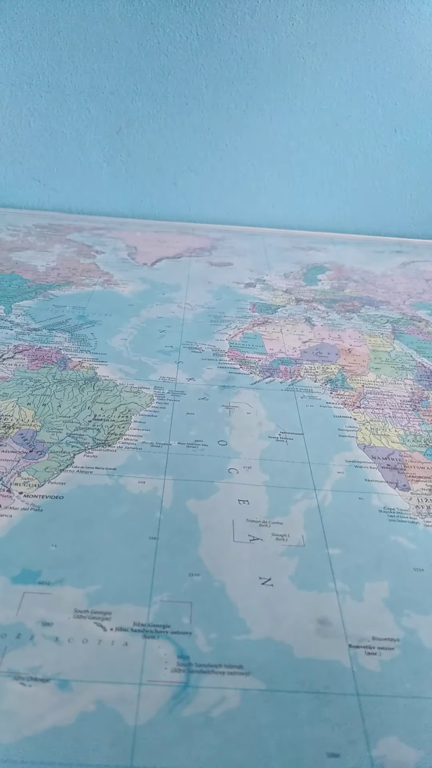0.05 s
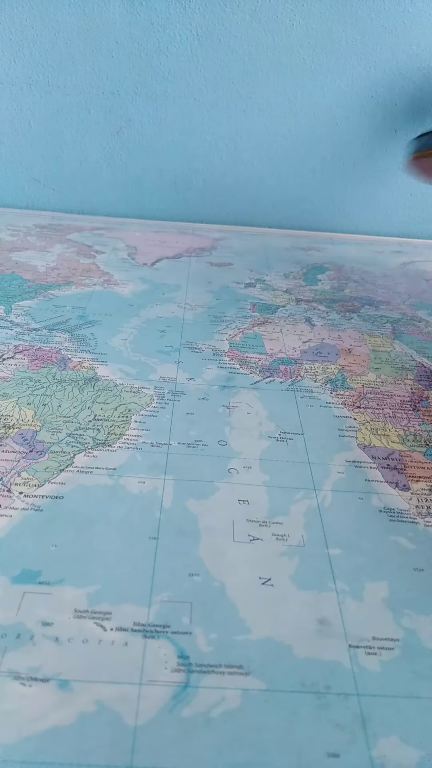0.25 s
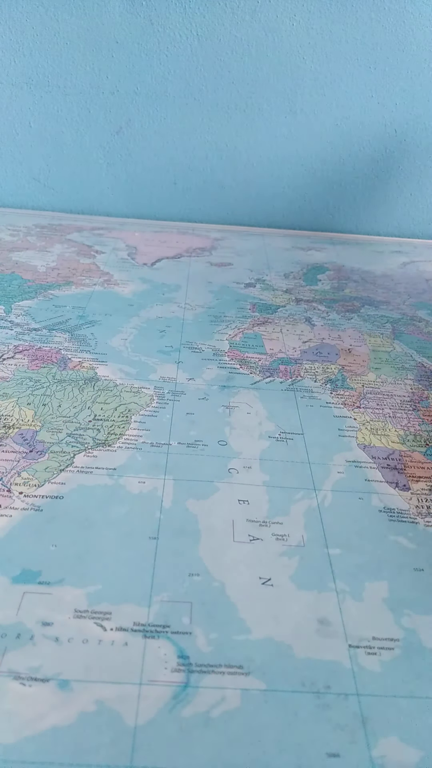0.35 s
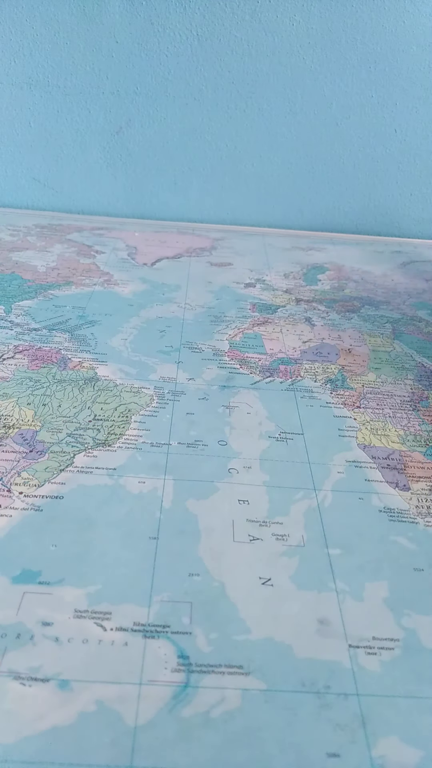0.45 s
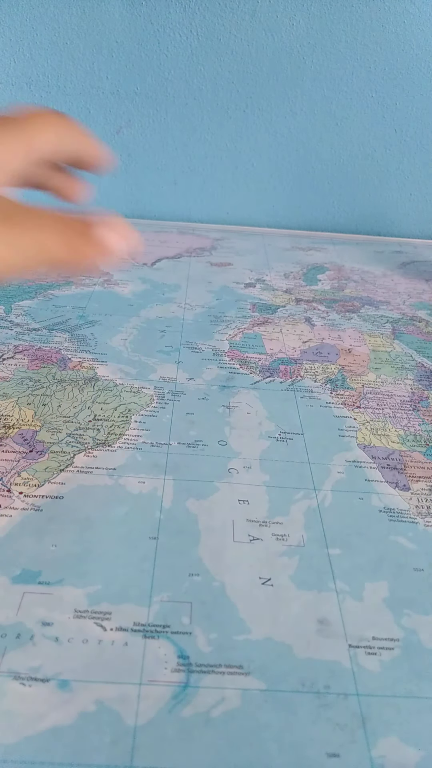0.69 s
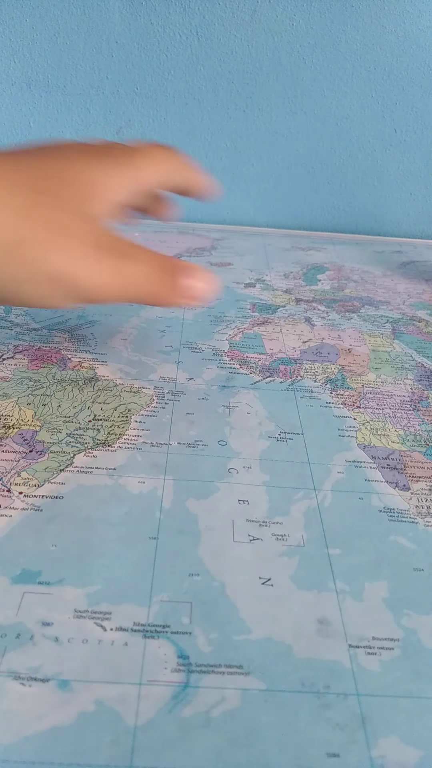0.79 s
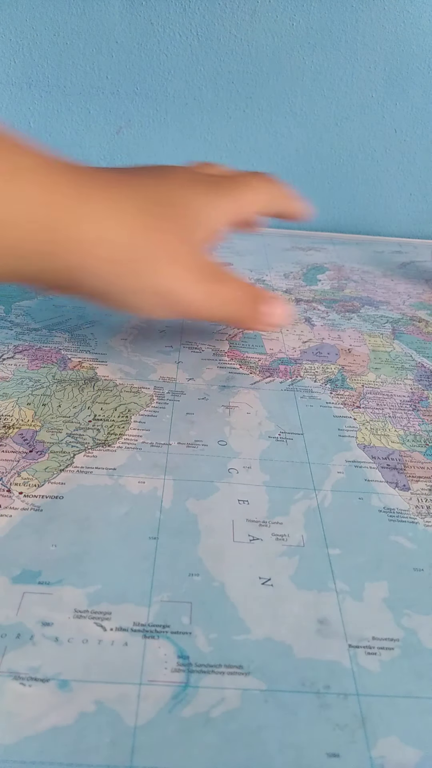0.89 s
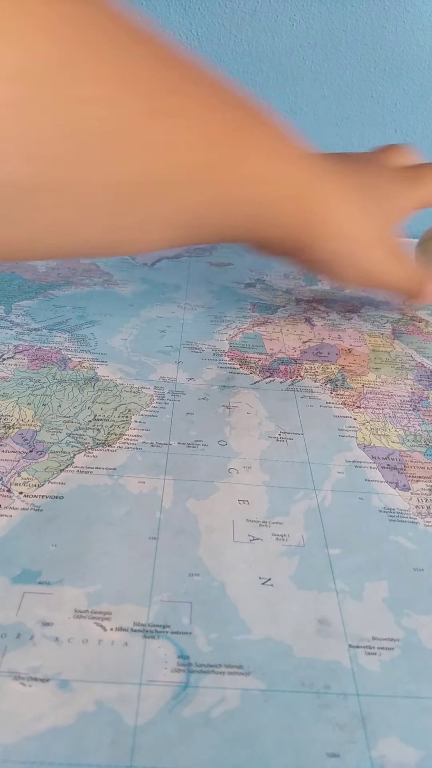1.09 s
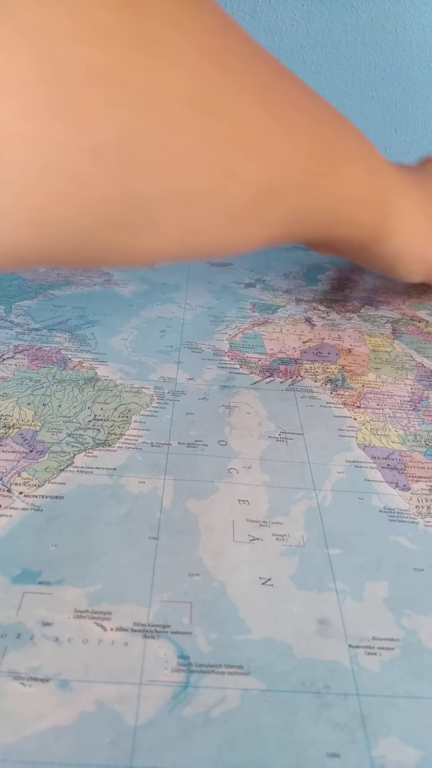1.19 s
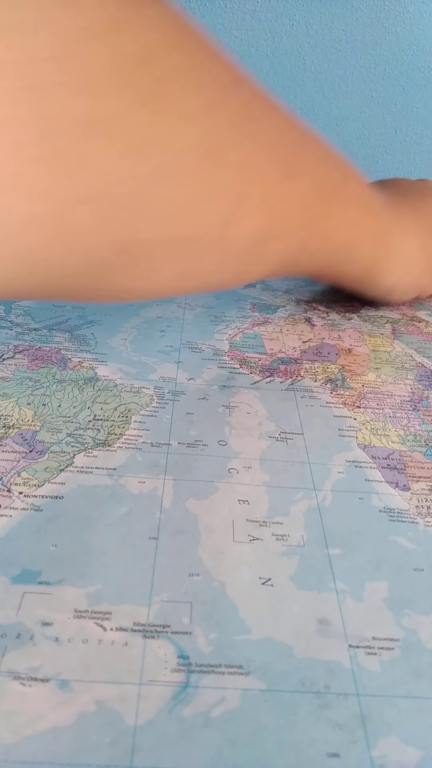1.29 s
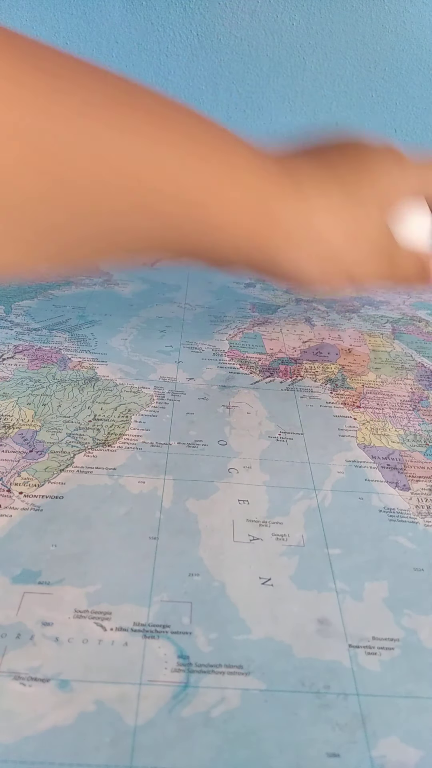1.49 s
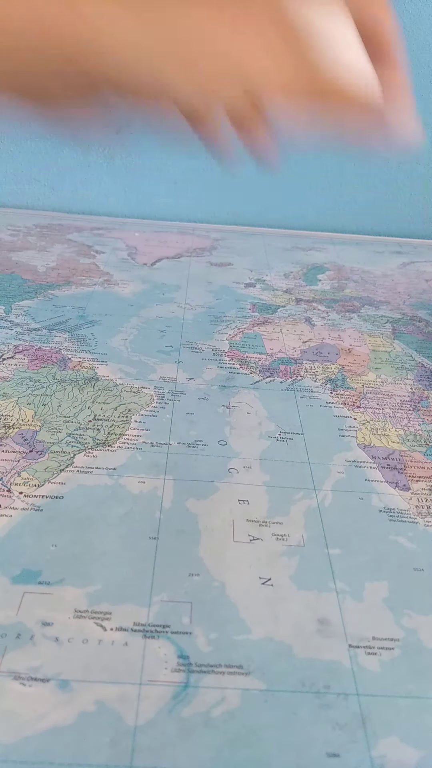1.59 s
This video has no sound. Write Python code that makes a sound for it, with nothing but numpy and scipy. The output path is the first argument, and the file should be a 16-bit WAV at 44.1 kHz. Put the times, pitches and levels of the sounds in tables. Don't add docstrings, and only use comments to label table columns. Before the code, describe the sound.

Two crisp hollow ball bounces ring a desk panel and small room, followed by a tiny double tick, then quiet dull arm bumps, skin hissing over paper and a nail tap, heard close in stereo by a phone.

```python
import sys
import numpy as np
from scipy import signal
from scipy.io import wavfile

SR = 44100
rng = np.random.default_rng(int(sys.argv[2]) if len(sys.argv) > 2 else 0)


def materialize(psi):
    bounded = np.clip(np.atleast_2d(psi).T, -1, 1)
    quanta = np.round(bounded * 32767).astype(np.int16)
    wavfile.write(sys.argv[1], SR, quanta)


def volts_from_db(level):
    exponent = np.asarray(level, float) / 20
    return 10 ** exponent


N = 72765

FADE_DB_PER_S2 = 174
PAPER_ALIKE = [(100, 0.7), (1400, -0.52), (4000, 0.03)]    # (pitch [Hz], likeness of left and right [-1..1])


def rms_one(x):
    return x / np.sqrt(np.mean(x ** 2) + 1e-20)


def in_time(rows):
    s, *columns = np.transpose(rows)
    return [np.interp(np.arange(N) / SR, s, column) for column in columns]


def at_hz(points, hz):
    table_hz, values = np.transpose(points)
    return np.interp(np.log(hz), np.log(table_hz), values)


def sides(pan_db):
    return volts_from_db(np.array([pan_db, -pan_db]) / 2)


def band(x, edges_hz):
    return signal.sosfilt(signal.butter(3, edges_hz, "band", fs=SR, output="sos"), x)


def steep(x, cut_hz):
    return signal.sosfilt(signal.cheby2(10, 40, cut_hz, fs=SR, output="sos"), x)


def drift(rate):
    r = np.exp(-80 * np.pi * rate / SR)
    slow = signal.lfilter([1], [1, -2 * r, r * r], rng.standard_normal(N // 40 + 502))[500:]
    return np.interp(np.arange(N) / 40, np.arange(len(slow)), rms_one(slow))


def flicker(patchy_db):
    together = 0.6 * drift(14)
    return lambda hz: volts_from_db(patchy_db * (together + drift(36.0)))


def banded(spectrum, alike, gain_at, size=N):
    out = 0
    edges_hz = 30 * 2 ** (np.arange(28) / 3)
    white = rng.standard_normal((2, 2, size))
    for k, (low, high) in enumerate(zip(edges_hz, edges_hz[1:])):
        third = signal.butter(2, [low, high], "band", fs=SR, output="sos")
        mid, side = signal.sosfilt(third, white[k % 2])
        hz = np.sqrt(low * high)
        likeness = np.clip(at_hz(alike, hz), -1, 1)
        stereo = np.sqrt(1 + likeness) * mid + np.sqrt(1 - likeness) * side * [[1], [-1]]
        out = out + volts_from_db(at_hz(spectrum, hz)) * gain_at(hz) * stereo
    return out


def ring(clicks, hz, t60):
    r, w = volts_from_db(-60 / (t60 * SR)), 2 * np.pi * hz / SR
    return signal.lfilter([0, np.sin(w)], [1, -2 * r * np.cos(w), r * r], clicks + 1e-18)


def bounce(contacts, modes):
    left_lag_s = 0.0002
    out = np.zeros((2, N))
    for hz, level_db, t60, pan_db in modes:
        clicks = np.zeros((2, N))
        for s, db, side_db, bright_db in contacts:
            at = [int((s + left_lag_s) * SR), int(s * SR)]
            chance_db = rng.normal(0, 1.5, 2)
            strike_db = db + level_db + bright_db * np.log2(hz / 3000) + chance_db
            clicks[[0, 1], at] = volts_from_db(strike_db) * sides(side_db + pan_db) * rng.choice([-1, 1])
        out += ring(clicks, hz, t60)
    return out


def ball_bounces():
    # (time [s], level [dB], left-right [dB], brightness [dB per octave])
    first_contacts = [
        (.2097, -27, 2, 5.),
        (.2112, -8, -1, 0.),
        (.2119, -9, 2, -1.),
    ]
    second_contacts = [
        (.4789, -29.5, -1, 13),
        (.4797, -9, 1, 1.75),
        (.4806, -7.5, 0.53, 0.87),
    ]
    # (pitch [Hz], level [dB], t60 [s], left-right [dB])
    first_modes = [(438, -4.5, 0.022, -0.5), (814, -10, 0.021, -1), (1760, -4.5, 0.0068, 4.5),
                   (2980, 2, 0.0051, 7.5), (3560, -2, 0.0041, 7), (6870, 0.5, 0.0022, 13),
                   (8870, -8.5, 0.0067, -18.5), (9800, -27, 0.0064, -22), (11380, -11, 0.011, 7.5),
                   (13400, -6.5, 0.0064, 4)]
    second_modes = [(420.5, 1, 0.026, 5.5), (907, -16, 0.028, 11.5), (1645, 3.5, 0.0064, 0.5),
                    (2710, -7, 0.0078, 11.5), (3360, -16, 0.007, -9.5), (2130, -19, 0.004, -3),
                    (8750, -10, 0.013, 3), (10180, -15, 0.0047, -6), (11700, -13.5, 0.0057, 8.5),
                    (13600, -24, 0.011, 13)]
    return bounce(first_contacts, first_modes) + bounce(second_contacts, second_modes)


def edge_ticks():
    # (time [s], level [dB], left-right [dB], brightness [dB per octave])
    edge_contacts = [
        (.5815, -23, 4.8, 0.013),
        (.5843, -26.5, 3, 0.),
    ]
    # (pitch [Hz], level [dB], t60 [s], left-right [dB])
    edge_modes = [(1750, -2.5, 0.0062, 0), (2710, -13, 0.0025, 0), (6500, -14, .002, 0),
                  (7900, -2, 0.0034, 0), (9640, -2.5, 0.0048, 1), (12100, -8, .003, 1),
                  (13200, -18, .002, 0)]
    rebound_modes = [(420, 1, 0.013, 0), (2300, -12, 0.0034, 0), (4630, -4, 0.0036, 0),
                     (6250, 3.5, 0.0014, 0), (8000, 7.5, 0.0064, 0), (10100, 2, .003, 1),
                     (11700, -5, .003, 1)]
    return bounce(edge_contacts[:1], edge_modes) + bounce(edge_contacts[1:], rebound_modes)


def desk():
    # (time [s], level [dB], tilt [dB per octave], boost of the lowest modes [dB])
    desk_blows = [
        (0.21, -29, 1.5, 1),
        (.481, -31.5, -4, 6),
        (0.584, -40, -7, 15.5),
    ]
    # (pitch [Hz], level [dB], t60 [s], swell [s])
    panel_modes = [(113.4, -17, 0.35, 0.0032), (133, -27, 0.13, 0.0025), (196.36, 3, 0.5, 0.0017),
                   (205.24, 4, 0.36, 0.0037), (239.1, -9.5, 0.91, 0.012), (301.5, 2, 0.44, 0.035),
                   (415.3, 0, 0.48, 0.004), (503.3, 0.5, 0.39, 0.0031), (635, 0.5, 0.16, 0.0049),
                   (716, -7.5, 0.2, 0.0076), (914, -18, 1, 0.043), (963, -19, 0.17, .01)]
    out = np.zeros(N)
    for s, db, tilt_db, lowest_db in desk_blows:
        start = int(s * SR)
        t = np.arange(N - start) / SR
        for k, (hz, level_db, t60, swell_s) in enumerate(panel_modes):
            blow_db = db + level_db + tilt_db * np.log2(hz / 200) + lowest_db * (hz < 150)
            fall = volts_from_db(blow_db - 60 * t / t60 - FADE_DB_PER_S2 * t ** 2)
            swell = 1 - np.exp(-t / swell_s)
            out[start:] += (-1) ** k * fall * swell * np.sin(2 * np.pi * hz * t)
    return out * sides(5.7)[:, None]


def echoes(x):
    # (delay [s], left level [dB], right level [dB])
    wall_echoes = [(.0045, -20, -12), (.0090, -16, -9), (.0110, -17, -12), (.0160, -28, -14),
                   (.0195, -20, -19), (.0265, -26, -18)]
    paths = np.zeros((2, SR // 20))
    for s, left_db, right_db in wall_echoes:
        at = int(s * SR) + rng.integers(0, 35, (2, 4))
        paths[[[0], [1]], at] = volts_from_db([[left_db], [right_db]]) * rng.normal(0, 0.31, (2, 4))
    return signal.fftconvolve(x, paths, axes=1)[:, :N]


def room():
    # (time [s], level [dB], extra fall [dB per s])
    room_tails = [
        (0.211, -27, -9),
        (.480, -27.5, 50),
        (0.581, -47.5, 19),
    ]
    # (pitch [Hz], level [dB])
    first_colour = [(120, -37), (200, -8), (700, -12), (1300, -20.5), (3600, -21), (5500, -31.5),
                    (9000, -25.5), (14000, -44)]
    second_colour = [(120, -23), (210, -7), (1300, -20), (1870, -7.5), (3800, -25.5), (5300, -38),
                     (8700, -31), (14000, -35)]
    edge_colour = [(100, -9), (400, -8), (3500, -37), (6000, -28), (10000, -41)]
    # (pitch [Hz], t60 [s])
    tail_t60 = [(150, 0.7), (800, 0.84), (4000, 0.69), (12000, 0.65)]
    # (pitch [Hz], likeness of left and right [-1..1])
    room_alike = [(60, 0.49), (200, 0.8), (640, 0.87), (1400, -0.51), (3000, 0.13)]
    start_s, swell_s = 0.0013, 0.011
    out, size = np.zeros((2, N)), SR // 2
    t = np.maximum(np.arange(size) / SR - start_s, 0)
    for (s, db, fall_db), colour in zip(room_tails, (first_colour, second_colour, edge_colour)):
        tail = banded(colour, room_alike, lambda hz: volts_from_db(-60 * t / at_hz(tail_t60, hz)), size=size)
        fall = volts_from_db(db + 22 - fall_db * t - FADE_DB_PER_S2 * t ** 2)
        start = int(s * SR)
        out[:, start:start + size] += tail * fall * (1 - np.exp(-t / swell_s))
    return out * sides(2.85)[:, None]


def rubbing():
    # (time [s], level [dB], left-right [dB])
    rub_moves = [(0, -62.5, 22), (.11, -62, 22.5), (.18, -63, 20), (.43, -79, 45), (.47, -46, -6),
                 (.72, -54.5, 10), (.80, -60.5, 4), (.99, -59.5, 18), (1.05, -61.5, 7.5), (1.10, -54.5, 0),
                 (1.15, -49.5, 12), (1.25, -49.5, 10.5), (1.30, -43.5, 0.5), (1.345, -54.5, 4),
                 (1.385, -51, 1), (1.50, -51.5, -1), (1.61, -44.5, -2), (1.65, -50, -2)]
    # (pitch [Hz], level [dB])
    rub_colour = [(300, -26), (1000, -17.5), (3400, -18), (6000, -19.5), (8000, -13.5), (10100, -8.5),
                  (13000, -25), (14600, -12)]
    rub_db, pan_db = in_time(rub_moves)
    return volts_from_db(rub_db) * sides(pan_db) * rms_one(banded(rub_colour, PAPER_ALIKE, flicker(1.0)))


def thumps():
    # (time [s], level [dB], pitch [Hz], t60 [s], left-right [dB])
    arm_thumps = [(0, -57, 118, 0.25, 14), (0.873, -50, 116, 0.021, 17), (1.064, -45, 122, 0.05, -27.5),
                  (1.076, -37, 262, 0.023, 8), (1.151, -45.5, 108.6, 0.19, -22),
                  (1.194, -43, 168, 0.032, -26), (1.200, -37, 278, 0.018, -22),
                  (1.254, -34.5, 245, 0.023, -13), (1.307, -46, 121, 0.075, -11),
                  (1.354, -62, 106, 0.08, -37)]
    out = np.zeros((2, N))
    for s, db, hz, t60, pan_db in arm_thumps:
        start = int(s * SR)
        t = np.arange(min(int(t60 * SR), N - start)) / SR
        phase = rng.uniform(0, 2 * np.pi) + rng.normal(0, 0.78, (2, 1))
        rounded = 1 - np.exp(-t * hz * 7.0)
        push = rounded * volts_from_db(-60 * t / t60) * np.sin(2 * np.pi * hz * t + phase)
        out[:, start:start + len(t)] += volts_from_db(db + 0.5) * sides(pan_db)[:, None] * push
    return out


def drag():
    # (time [s], level [dB])
    drag_moves = [(1.05, -93), (1.08, -52), (1.13, -60), (1.2, -50), (1.31, -54), (1.345, -63.5)]
    lumps = volts_from_db(in_time(drag_moves)[0] + 2.0 * np.array([drift(33.0), drift(30.0)]))
    low_noise = band(rng.standard_normal((2, N)), (88, 460))
    return lumps * sides(4.8)[:, None] * rms_one(low_noise)


def rustle():
    # (time [s], level [dB])
    rustle_moves = [(1.04, -95), (1.075, -52), (1.12, -55), (1.30, -63), (1.34, -99), (1.44, -64.5),
                    (1.52, -55.5), (1.60, -53), (1.65, -53)]
    # (pitch [Hz], level [dB])
    rustle_colour = [(150, -8.5), (400, -2.5), (1300, -13), (2700, -6.5), (4300, -10.5), (6000, -27)]
    noise = rms_one(banded(rustle_colour, PAPER_ALIKE, flicker(0.9)))
    return volts_from_db(in_time(rustle_moves)[0]) * sides(12.6)[:, None] * noise


def nail_taps():
    # (time [s], level [dB], left-right [dB], brightness [dB per octave])
    nail_contacts = [
        (1.5986, -32, 0, 0.),
        (1.078, -44, 0, 2.),
        (1.088, -48, 0, 0.),
        (1.200, -46, -6, 0.),
    ]
    # (pitch [Hz], level [dB], t60 [s], left-right [dB])
    nail_modes = [(380, -10, .03, 0), (620, -9, .012, 0), (1020, -7, .018, 0), (1500, -5, .004, 0),
                  (2100, -3, .003, 0), (2900, -3, .003, 0)]
    return bounce(nail_contacts, nail_modes)


def noise_floor():
    # (time [s], level [dB])
    floor_level = [(.1, -55.5), (.8, -57.5), (1., -53), (1.3, -55.5), (1.37, -66), (1.5, -85)]
    # (pitch [Hz], level [dB])
    floor_colour = [(40, 4), (100, -1), (500, -2), (3400, -13), (5900, -12), (10400, -20), (14000, -40)]
    # (pitch [Hz], likeness of left and right, limited to [-1..1])
    floor_alike = [(60, -0.65), (180, 0.58), (550, 0.15), (1650, -0.17), (4970, 0.34), (15000, -1.5)]
    return volts_from_db(in_time(floor_level)[0]) * rms_one(banded(floor_colour, floor_alike, flicker(0.93)))


def scene():
    ball_band_hz = (193, 12500)
    hits = band(ball_bounces(), ball_band_hz)
    ticks = band(edge_ticks() + nail_taps(), ball_band_hz)
    ringing_on = desk() + echoes(band(hits, (570, 14000))) + room()
    hand = rubbing() + thumps() + drag() + rustle()
    return hits + ticks + steep(ringing_on + hand + noise_floor(), 14750)


def roll_off(x):
    return signal.sosfilt(signal.butter(12, 16520, fs=SR, output="sos"), x)


def record(dry):
    dip = 0.66
    dipped = signal.sosfilt(signal.butter(2, (4325, 7860), "bandstop", fs=SR, output="sos"), dry)
    x = (1 - dip) * dry + dip * dipped
    x = signal.sosfilt(signal.butter(3, 69, "high", fs=SR, output="sos"), x)
    x = steep(np.tanh(x), 16000)
    return roll_off(x)


dry = scene()
out = record(dry)
materialize(out)
```